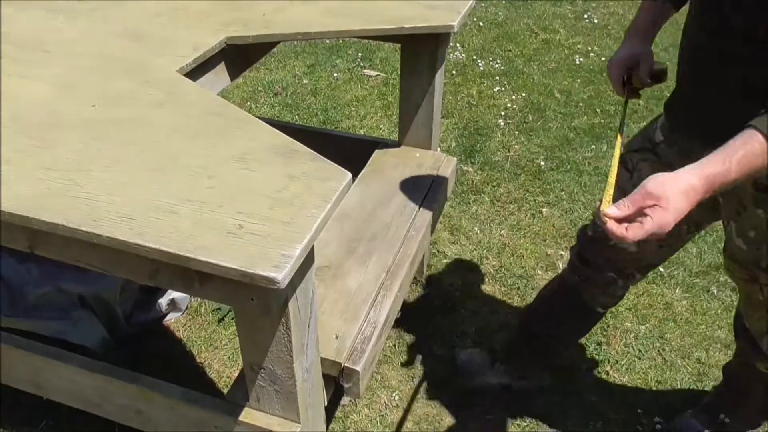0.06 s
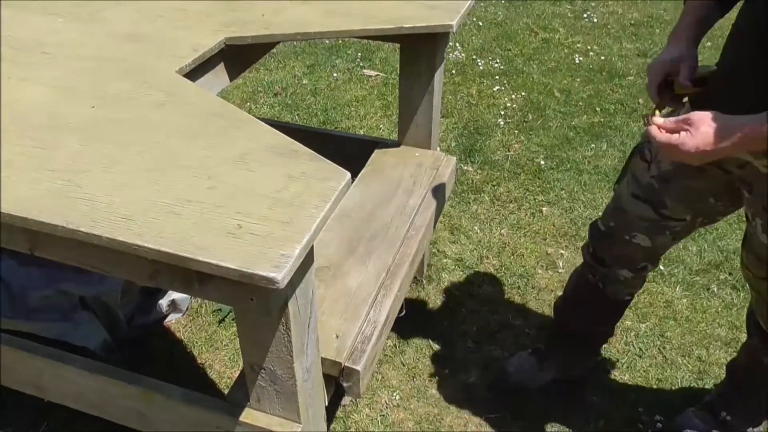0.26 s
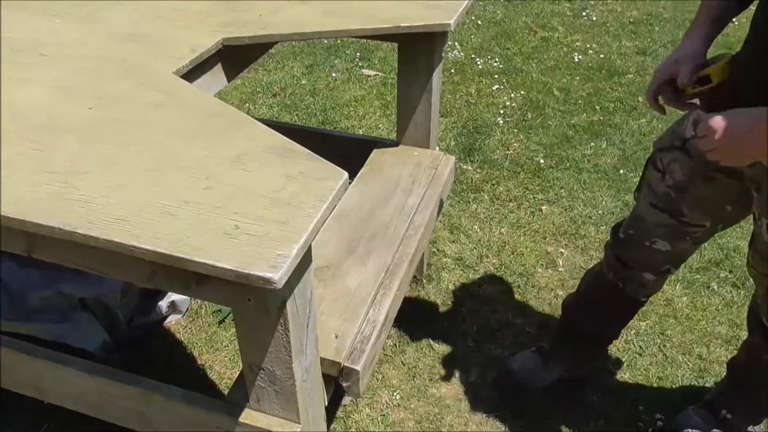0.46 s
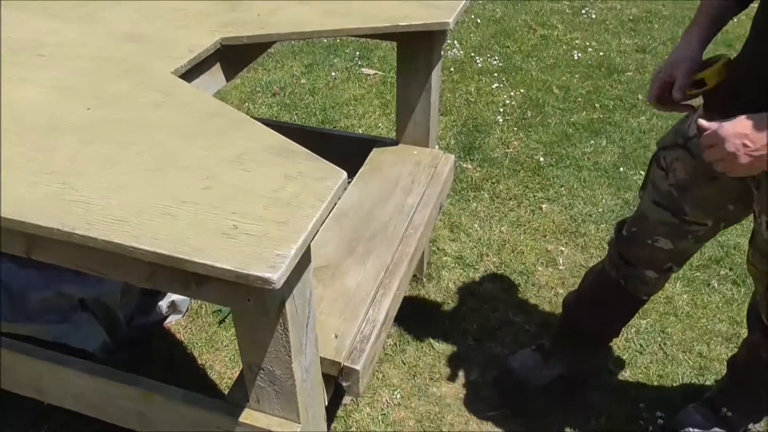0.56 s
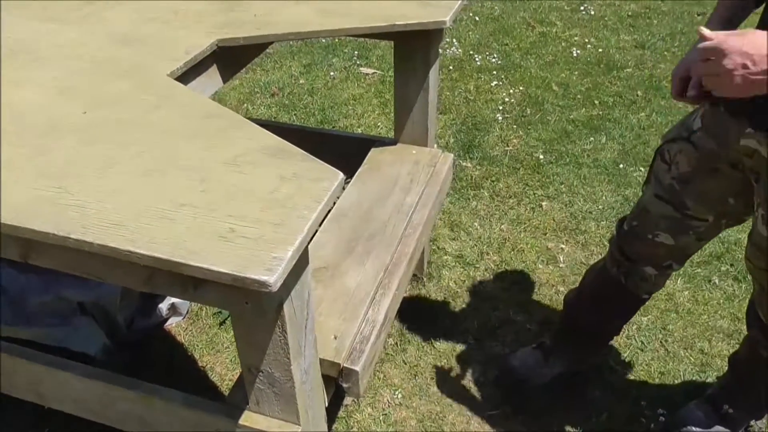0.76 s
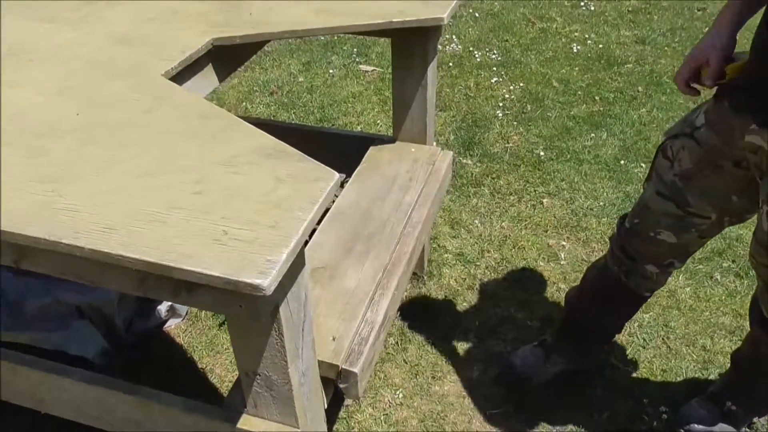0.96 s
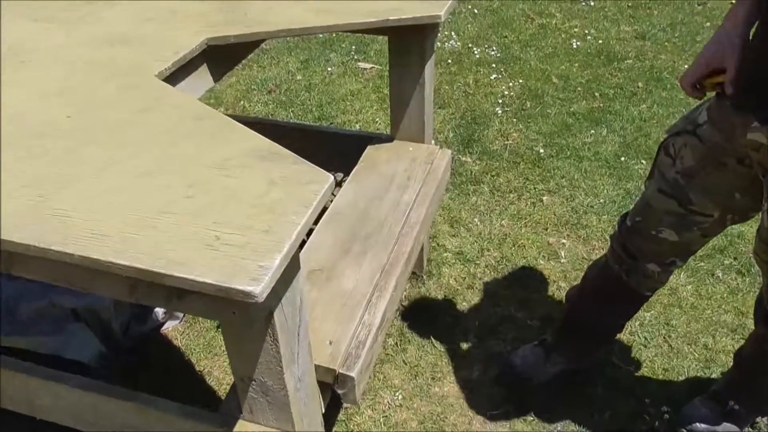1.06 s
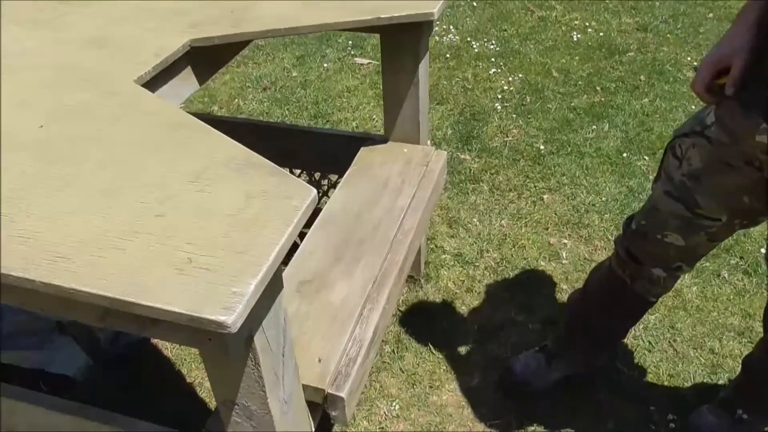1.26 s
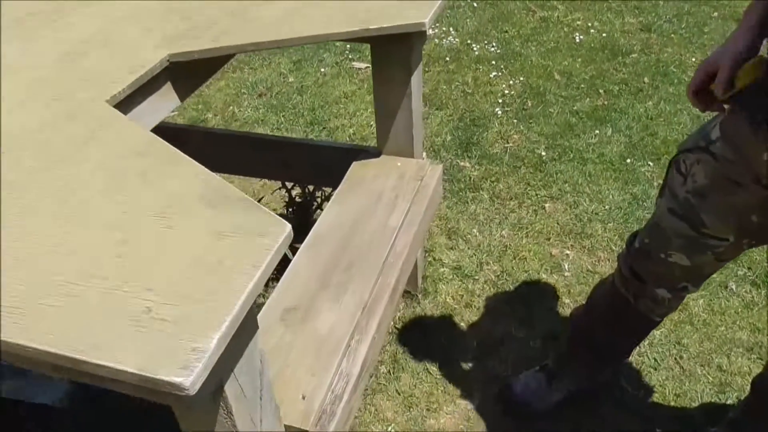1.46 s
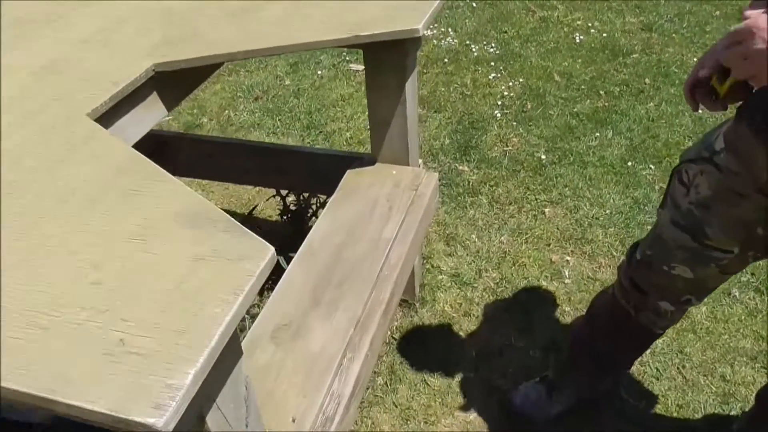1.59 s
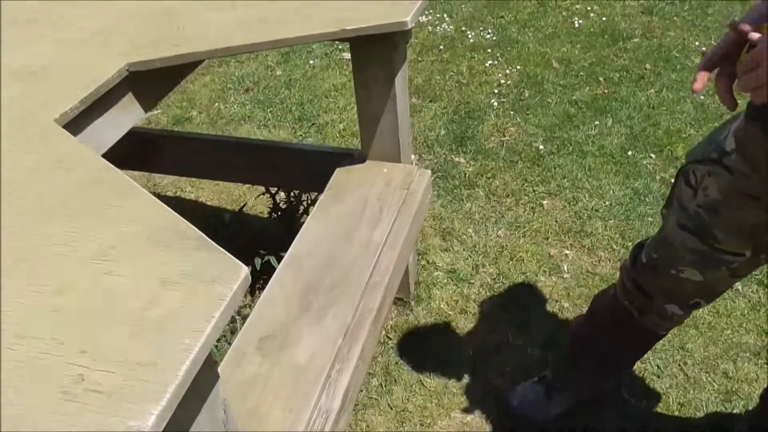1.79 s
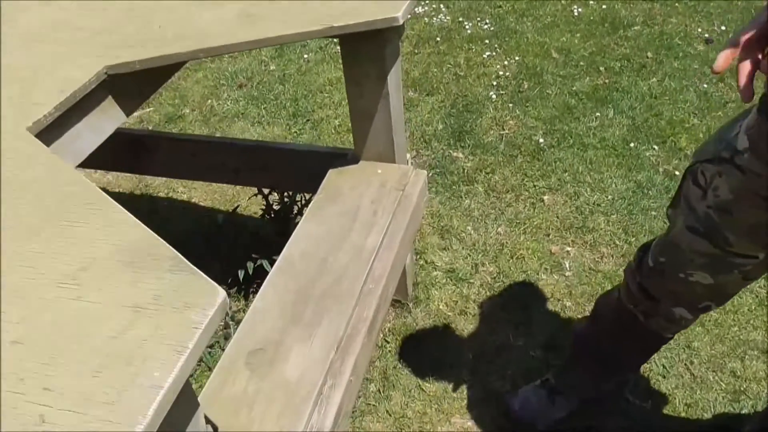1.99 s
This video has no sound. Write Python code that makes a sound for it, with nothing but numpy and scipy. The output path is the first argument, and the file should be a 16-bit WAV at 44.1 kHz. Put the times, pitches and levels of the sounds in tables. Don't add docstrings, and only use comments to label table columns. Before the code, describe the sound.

Steel tape slides into a plastic case with a grainy hiss and faint spring whir, clicks and snaps home within half a second; afterwards soft handling ticks and strengthening wind thumps in open air.

```python
import sys
import numpy as np
from scipy import signal
from scipy.fft import rfft, irfft, next_fast_len
from scipy.io import wavfile
from scipy.ndimage import uniform_filter1d, map_coordinates

SR = 44100
rng = np.random.default_rng(int(sys.argv[2]) if len(sys.argv) > 2 else 0)


def materialize(psi):
    bounded = np.clip(np.atleast_2d(psi).T, -1, 1)
    quanta = np.round(bounded * 32767).astype(np.int16)
    wavfile.write(sys.argv[1], SR, quanta)


def makeup_ratio(level_db):
    decades = np.asarray(level_db, float) / 20
    return 10 ** decades


N = 89611

# frequency in Hz, level in dB per Hz.
AIR_COLOUR = [(410, -39), (700, -5), (1230, -8.5), (1340, -17), (1930, -21), (2180, -18.5), (3780, -25),
              (15300, -24), (16500, -34)]
# time in seconds, level in dB.
WIND_STRENGTH = [(0, -49.5), (.08, -50.5), (.17, -42), (.32, -40), (.5, -42), (.63, -48), (.7, -44.5),
                 (.8, -39), (.87, -45), (1.0, -35.5), (1.12, -40.5), (1.2, -38), (1.3, -33.5), (1.4, -31.5),
                 (1.58, -38), (1.68, -40), (1.8, -34), (2.03, -30)]
# frequency in Hz, level in dB per Hz.
WIND_COLOUR = [(15, -78), (25, -20), (148, 0), (362, -14.5), (510, -18.5), (730, -25), (810, -27),
               (897, -31), (1500, -59.5), (1950, -89), (3300, -120)]
# time in seconds, level in dB.
TAPE_SPEED = [(0, -60.5), (.05, -50), (.14, -43.5), (.187, -47), (.21, -41.5), (.26, -45), (.335, -37.5),
              (.365, -39.5), (.47, -46), (.53, -43), (.558, -62), (.61, -65), (.68, -79)]
# frequency in Hz, level in dB per Hz.
HISS_COLOUR = [(500, -0.5), (1000, 0.5), (1700, -6.5), (4600, -1), (7100, -13.5), (8300, 1), (11500, -1),
               (16300, -23.5)]
# time in seconds, pitch in Hz, level in dB.
DRUM_SONG = [
    (0, 541, -63.5),
    (.16, 520, -55.5),
    (.21, 586, -45.5),
    (.28, 566.5, -47.5),
    (.32, 539, -50.5),
    (.345, 553, -41),
    (.40, 560, -45.5),
    (.455, 530, -42),
    (.485, 545, -68),
]
# start in seconds, level in dB, length in seconds, dullness in dB.
SLAP_HITS = [(.0897, -40.5, 0.0048, -6), (.1935, -33, 0.0013, -3), (.1953, -25.5, .002, -5),
             (.1987, -29, 0.0022, -11), (.202, -32, 0.0039, -3.5), (.3296, -32.5, 0.012, -0.5),
             (.378, -46, 0.0028, 14), (.4339, -30, 0.0062, -0.5), (.4813, -56, .006, -6.5),
             (.535, -32.5, 0.0044, 2.5), (.5395, -13.5, 0.0016, -6.5), (.5427, -19, 0.0021, 0),
             (.547, -27.5, 0.0019, 14.5), (.552, -44.5, 0.0093, 30.5), (.568, -43.5, 0.003, 18),
             (.579, -47.5, 0.0051, 9), (.588, -50, .002, 14.5), (.595, -56, 0.0035, 12),
             (.6035, -54.5, 0.0063, 21.5), (.635, -65, 0.0081, 18)]
# frequency in Hz, level in dB per Hz.
SLAP_COLOUR = [(250, -7.5), (1000, -9.5), (4500, -3), (7100, -11), (8400, -2.5), (10300, 2), (13500, -15),
               (15800, -25), (16500, -60)]
# start in seconds, level in dB, brightness in dB.
WIND_PUFFS = [(0.149, -37.5, -1), (0.199, -37.5, 8), (0.271, -31, 3), (0.305, -37, 1), (0.444, -45, 17),
              (0.58, -50, 12), (0.692, -32, -18), (0.764, -31.5, -2), (0.791, -28, -1), (1.048, -33.5, -6),
              (1.149, -31, 7), (1.186, -30, -0.5), (1.218, -39, 13), (1.256, -17, -9), (1.316, -33, 4),
              (1.389, -30, 1), (1.449, -37, -21), (1.523, -32.5, -25), (1.594, -23.5, -8), (1.64, -50, 6),
              (1.735, -25, -7), (1.781, -31.5, 12.5), (1.829, -27, 4.5), (1.947, -24, 10.5),
              (1.994, -22.5, 3.5), (2.004, -33, 5)]
# start in seconds, pitch in Hz, level in dB, 60 dB decay in seconds.
PORT_WHISTLES = [(.152, 748, -45, 0.042), (.69, 327.5, -40.5, 0.059), (1.218, 613, -36.5, 0.029),
                 (1.251, 792, -35.5, 0.054), (1.259, 610, -33.5, 0.033), (1.266, 844, -44.5, 0.027),
                 (1.328, 964, -48.5, 0.031), (1.369, 830, -48, 0.025), (1.393, 740, -48, .03),
                 (1.64, 802, -44.5, 0.024), (1.735, 361.4, -33.5, 0.076), (1.948, 618, -37, 0.026)]
# start in seconds, pitch in Hz, level in dB, 60 dB decay in seconds.
LOOSE_PARTS = [(.1953, 8370, -20.5, 0.0042), (.196, 4620, -25, 0.0046), (.199, 8400, -21, .004),
               (.548, 632, -34, 0.024), (.5685, 2300, -42.5, 0.015), (.569, 4150, -46, .015),
               (.579, 545, -38, .045), (.580, 4260, -49, 0.019), (.5395, 5400, -26, .012),
               (.603, 4265, -47, 0.013), (.605, 975, -46, 0.021)]
# pitch in Hz, level in dB, 60 dB decay in seconds.
CASE_MODES = [
    (298, -46, 0.074),
    (560, -40.5, 0.059),
    (777, -41.5, 0.03),
    (936, -38, 0.022),
    (1250, -38, .018),
    (2050, -33.5, .02),
]
# time in seconds, level in dB.
CLOTH_MOVES = [(0.621, -74.5), (.72, -74.5), (.95, -65), (1.05, -72.5), (1.16, -64.5), (1.25, -71),
               (1.45, -66.5), (1.599, -61), (1.75, -58), (1.85, -58.5), (2.03, -55)]
# frequency in Hz, level in dB per Hz.
CLOTH_COLOUR = [(710, -24.5), (1200, -5.5), (1430, -5.5), (2980, -18.5), (4040, -13), (7170, -18.5),
                (9820, -9), (11300, -13), (16000, -32.5)]
# start in seconds, level in dB, length in seconds, dullness in dB.
FINGER_TICKS = [(.7685, -52, 0.00095, 25), (.8419, -52, 0.0041, 17), (.8637, -63, 0.0012, 10),
                (.8818, -55, 0.0023, 4), (.9143, -50.5, 0.0013, 2.5), (.9252, -53, 0.00085, 6),
                (.9414, -49, .001, -2), (.9482, -54, .001, 12), (.9705, -49, 0.0011, -1),
                (.986, -52.5, 0.0035, 9), (1.155, -58, 0.0073, 4), (1.175, -55, 0.0045, 15),
                (1.3113, -63.5, 0.00075, -16), (1.4794, -58, 0.00097, -9), (1.484, -60, 0.0063, -3),
                (1.553, -58.5, 0.038, 10), (1.581, -54, 0.0016, -17), (1.6974, -56, 0.0064, -5),
                (1.906, -41, 0.0038, -3.5), (1.913, -41, 0.0041, -6.5), (2.027, -55, 0.0055, 9)]
# frequency in Hz, level in dB per Hz.
TICK_COLOUR = [(530, -17), (900, 4), (2070, -3), (2890, -11), (3730, -1.5), (6890, -21), (9310, -14),
               (13400, -21), (16000, -37.5)]
# start in seconds, pitch in Hz, level in dB, 60 dB decay in seconds.
TICK_TONES = [(.7685, 1550, -45, .012), (.771, 2200, -55, .02), (.842, 1000, -48.5, 0.013),
              (.843, 2185, -56, 0.013), (.882, 1550, -54, .01), (.885, 4000, -57.5, 0.013),
              (.9143, 3900, -49.5, .008), (.9143, 3200, -52, 0.0076), (.925, 1590, -56, .01),
              (.9414, 3700, -48.5, 0.0063), (.946, 4680, -56.5, 0.023), (.987, 3240, -52, 0.0095),
              (1.176, 1100, -49, 0.017), (1.4794, 6140, -50, .008), (1.484, 2600, -52.5, 0.0097),
              (1.49, 2050, -55, .015), (1.526, 1440, -58, .03), (1.553, 1320, -53, 0.033),
              (1.558, 4200, -62, .012), (1.566, 1560, -58, 0.035), (1.58, 6450, -57.5, .012),
              (1.584, 3970, -61.5, 0.015), (1.598, 1570, -54, 0.016), (1.654, 3980, -59.5, .012),
              (2.02, 1000, -44, .04)]
# frequency in Hz, left over right in dB.
STEREO_LEAN = [(500, 2.5), (2400, 0.5), (6000, -1), (9000, 3.5), (15000, 8)]
# frequency in Hz, lead of the left in radians.
STEREO_LEAD = [(500, -0.46), (6500, -0.65), (10000, -0.15), (15000, -2)]
# frequency in Hz, level of the unrelated part in dB.
STEREO_WIDTH = [(1000, -12), (5000, -12), (14000, -2)]

AIR_DB = -65.5
WIND_LEFT_DB, WIND_RIGHT_DB, WIND_APART_DB, LUMPS_DB = 6.5, 11.5, -16, 1.5
PUFF_RISE_S, PUFF_FALL_S, PUFF_LOW_HZ = 0.0035, 0.0087, 85
HOOK_S = .5425
DULL_HZ = 2980
SPIKE_S, SCRAPE_S = 0.00022, 0.004
NOTE_RISE = 0.17
ONE_SIDE = np.array([[1], [0]])


def unit(x):
    return x / np.sqrt(np.mean(x ** 2) + 1e-20)


def along(points, hz):
    f, v = np.transpose(points)
    return np.interp(np.log(hz + 1), np.log(f + 1), v)


def curves(rows):
    s, *cols = np.transpose(rows)
    return [np.interp(np.arange(N) / SR, s, c) for c in cols]


def wobble(rate):
    knots = rng.standard_normal(int(N * rate / SR) + 4)
    return map_coordinates(knots, [np.arange(N) * rate / SR])


def filtered(x, response):
    m = next_fast_len(N + 8192)
    return irfft(rfft(x, m) * response(np.fft.rfftfreq(m, 1 / SR)), m)[..., :N]


def noise(colour, grain_db=0, channels=2):
    white = rng.standard_normal((channels, N)) * makeup_ratio(grain_db * wobble(2500))
    return unit(filtered(white, lambda hz: makeup_ratio(along(colour, hz))))


def strokes(rows, sound, split_hz, rise_s, fall_s, spike=0):
    low = filtered(sound, lambda hz: 1 / (1 + (hz / split_hz) ** 2))
    high = sound - low
    t = np.arange(N) / SR
    out = np.zeros_like(sound)
    for s, db, length, dull_db in rows:
        rise = (t - s) / rise_s - 1
        fall = (s + length - t) / (fall_s + length / 2)
        shape = np.exp(np.minimum(np.minimum(rise, fall), 0))
        shape = shape * (1 + spike * np.exp(-np.abs(t - s - rise_s) / SPIKE_S - (length / SCRAPE_S) ** 2))
        burst = shape * (makeup_ratio(dull_db) * low + makeup_ratio(-dull_db) * high)
        out += makeup_ratio(db) * burst * np.linalg.norm(shape) / np.linalg.norm(burst[0])
    return out


def notes(rows, spread, shorter):
    out = np.zeros(N + SR)
    t = np.arange(SR // 10) / SR
    chances = rng.standard_normal((len(rows), 2, 4, 1))
    for (s, hz, db, t60), (detune, phase) in zip(rows, chances):
        neighbours = np.sin(2 * np.pi * hz * np.exp(spread * detune) * t + 2 * phase).sum(axis=0)
        cluster = np.sin(2 * np.pi * hz * t) + 0.63 * neighbours
        life = shorter * t60
        decay = makeup_ratio(db + 13 - 60 * t / life)
        soft_start = 1 - np.exp(-t / (NOTE_RISE * life))
        out[round(s * SR):][:len(t)] += decay * soft_start * cluster
    return out[:N]


def placed(pair, apart_db=0):
    side = np.array([[.5], [-.5]])
    direct = filtered(pair[0], lambda hz: makeup_ratio(side * along(STEREO_LEAN, hz))
                      * np.exp(1j * side * along(STEREO_LEAD, hz)))
    return direct + filtered(pair[1], lambda hz: 2 * side * makeup_ratio(along(STEREO_WIDTH, hz) + apart_db))


def air():
    return makeup_ratio(AIR_DB) * placed(noise(AIR_COLOUR), apart_db=4.0)


def wind():
    strength_db, = curves(WIND_STRENGTH)
    rumble = noise(WIND_COLOUR, channels=3)
    deep = filtered(rumble, lambda hz: 1 / (1 + (hz / PUFF_LOW_HZ) ** 4))
    top = filtered(rumble, lambda hz: hz ** 4 / (hz ** 4 + 400 ** 4))
    body = rumble - deep - top
    lumpy_body = makeup_ratio(LUMPS_DB * wobble(34.87) - 0.5) * body
    fluttering_top = makeup_ratio(1.6 * wobble(13.0) + 3.4 * wobble(120) - 5) * top
    flow = makeup_ratio(strength_db) * (makeup_ratio(8) * deep + lumpy_body + fluttering_top)
    flow = flow + puffs(body, top) + whistles() * [[1], [0], [0]]
    flow = filtered(flow, lambda hz: hz ** 4 / (hz ** 4 + 45 ** 4))
    sides = np.array([-makeup_ratio(WIND_LEFT_DB), makeup_ratio(WIND_RIGHT_DB)])[:, None]
    return sides * flow[0] + makeup_ratio(WIND_RIGHT_DB + WIND_APART_DB) * flow[1:]


def tape_hiss():
    speed_db, = curves(TAPE_SPEED)
    return makeup_ratio(speed_db + 2.3 * wobble(60) + .7 * wobble(300)) * noise(HISS_COLOUR, grain_db=2.0)


def drum():
    pitch_hz, level_db = curves(DRUM_SONG)
    turn = 2 * np.pi * np.cumsum(pitch_hz + 14 * wobble(45)) / SR
    rough = makeup_ratio(1) * np.sin(turn + 2.2 * wobble(140))
    return makeup_ratio(level_db + 1.3 * wobble(45)) * (np.sin(turn) + rough)


def slaps():
    return strokes(SLAP_HITS, noise(SLAP_COLOUR, grain_db=2.0), DULL_HZ, rise_s=0.00045, fall_s=0.00036)


def puffs(body, top):
    thump_rows = [(s, db, 0, 0) for s, db, _ in WIND_PUFFS]
    crest_rows = [(s + PUFF_RISE_S, db + bright_db - 15.0, 0, 0) for s, db, bright_db in WIND_PUFFS]
    thumps = strokes(thump_rows, body, DULL_HZ, PUFF_RISE_S, PUFF_FALL_S)
    return thumps + strokes(crest_rows, top, DULL_HZ, rise_s=0.0021, fall_s=.006)


def whistles():
    return notes(PORT_WHISTLES, spread=.1, shorter=0.87)


def rattles():
    return notes(LOOSE_PARTS, spread=.1, shorter=0.76)


def case_ring():
    t = np.maximum(np.arange(N) / SR - HOOK_S, 0)
    return 3 * sum(makeup_ratio(db - 60 * t / t60) * np.sin(2 * np.pi * hz * t) for hz, db, t60 in CASE_MODES)


def cloth():
    level_db, = curves([(.55, -85.5)] + CLOTH_MOVES)
    catches = (rng.random(N) < 60 / SR) * 1.
    crackle = uniform_filter1d(catches, size=30) * 45
    return makeup_ratio(level_db - 1.5 + 1.4 * wobble(90)) * (1 + crackle) * noise(CLOTH_COLOUR, grain_db=1.5)


def ticks():
    clicks = strokes(FINGER_TICKS, noise(TICK_COLOUR, grain_db=1.5), DULL_HZ,
                     rise_s=.00015, fall_s=.0025, spike=3)
    return clicks + notes(TICK_TONES, spread=0.17, shorter=0.63) * ONE_SIDE


def scene():
    tape = tape_hiss() + slaps() + (drum() + case_ring() + rattles()) * ONE_SIDE
    hands = cloth() + ticks()
    return air() + wind() + placed(tape) + placed(hands)


def top_cut(x):
    return signal.sosfilt(signal.butter(12, 16500, fs=SR, output="sos"), x)


def record(dry):
    return top_cut(dry)


dry = scene()
out = record(dry)
materialize(out)
```